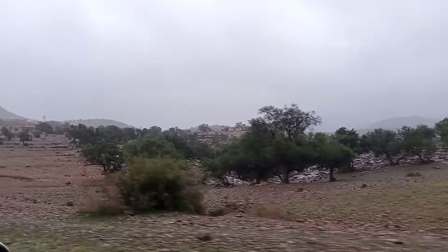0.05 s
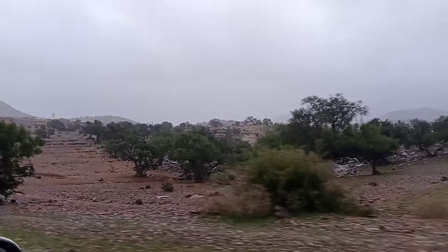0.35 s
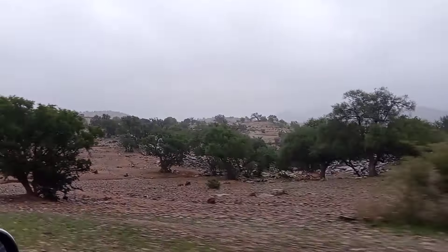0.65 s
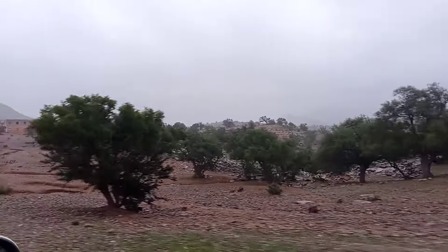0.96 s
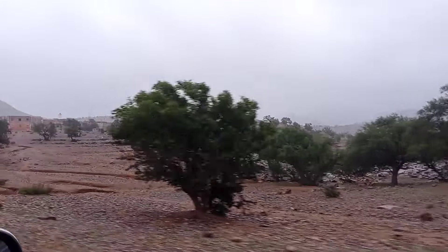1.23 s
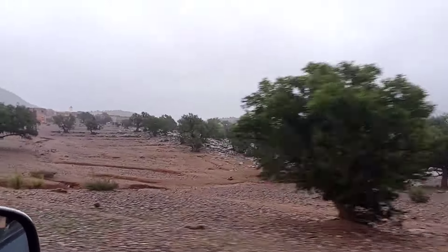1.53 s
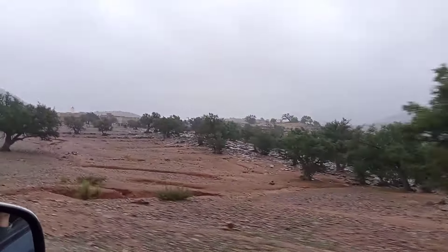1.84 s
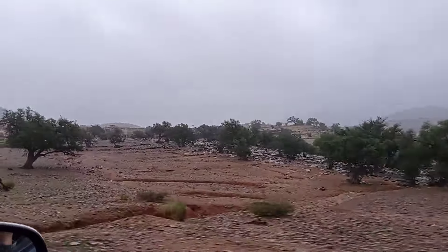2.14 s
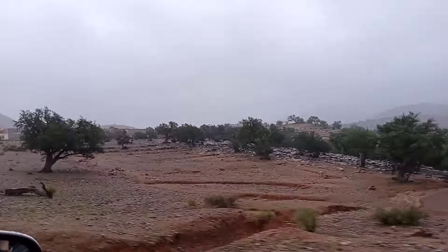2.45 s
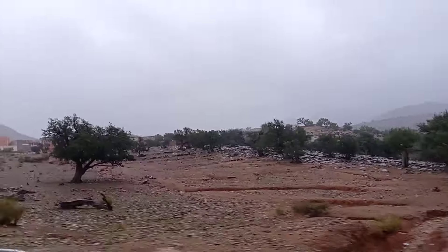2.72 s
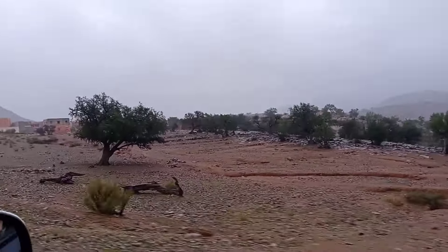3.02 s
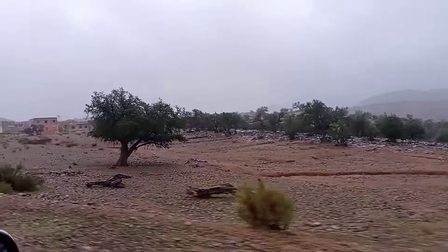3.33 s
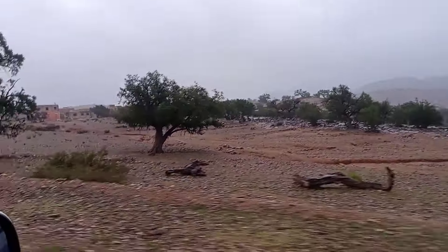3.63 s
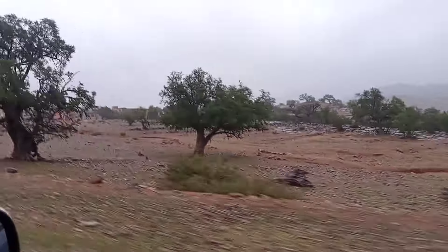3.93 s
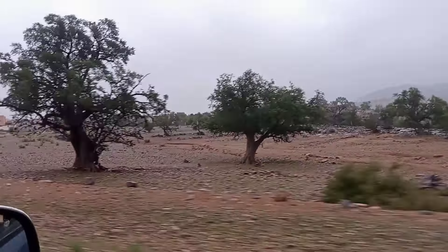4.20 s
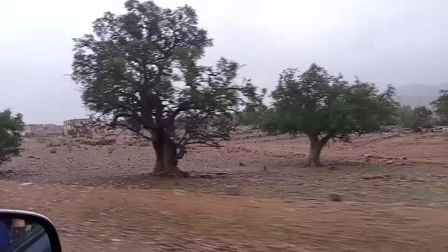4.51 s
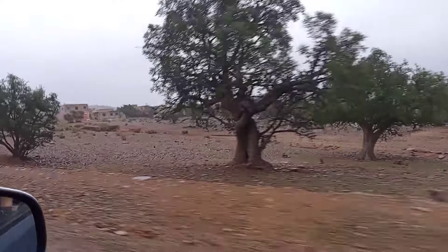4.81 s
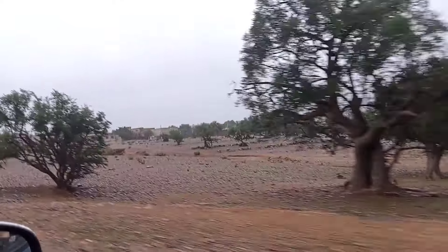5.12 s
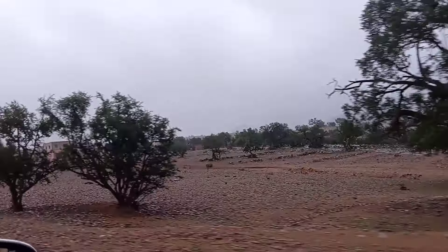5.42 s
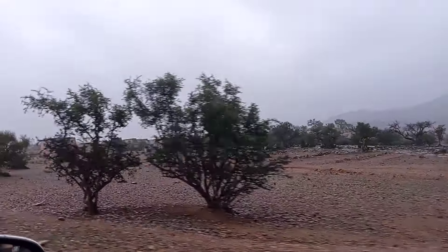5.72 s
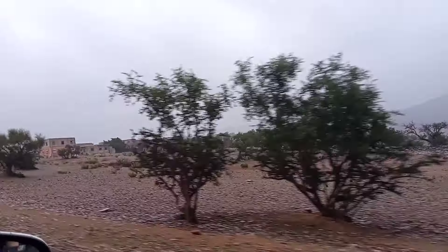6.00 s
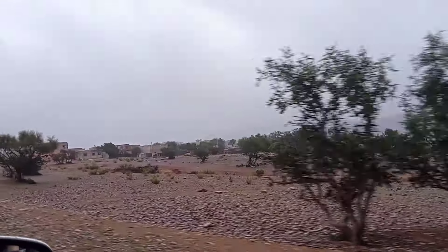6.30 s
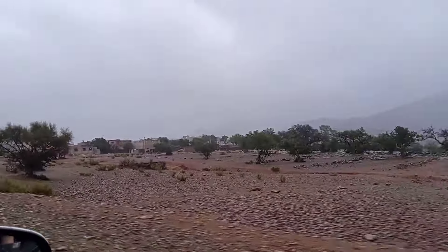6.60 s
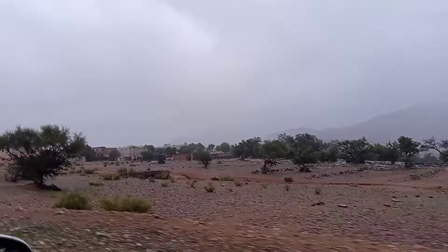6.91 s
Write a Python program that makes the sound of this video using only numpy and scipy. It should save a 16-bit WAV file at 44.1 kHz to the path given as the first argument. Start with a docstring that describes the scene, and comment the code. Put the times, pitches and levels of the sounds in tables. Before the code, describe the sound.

A car drives along with a low rumble while gusty wind slaps, crackles and faintly whistles at an open side window.

```python
"""A car drives steadily along a country road, heard at an open side window.
From the start, eddies slap the microphone about twelve times a second over road and engine rumble,
a hollow roar and rushing air. Near 1.5 s a window edge whistles faintly. A gust swells at 3 s with a
louder roar and another whistle. From 4 s rush and roar ease while the eddies crack more often.
Gusts return from 5.6 s, and the edge whistles twice more before the end."""
import sys
import numpy as np
from scipy import signal
from scipy.fft import rfft, irfft
from scipy.io import wavfile
from scipy.ndimage import uniform_filter1d, minimum_filter1d

SR = 44100
rng = np.random.default_rng(int(sys.argv[2]) if len(sys.argv) > 2 else 0)


def digitize_waveform(pressure):
    """Quantize a signal to 16-bit integers and store it at the path in sys.argv[1].

    Rows of a 2-D input are taken as channels; values are limited to [-1, 1].
    """
    field = np.atleast_2d(pressure).T
    bounded = np.clip(field, -1, 1)
    quanta = np.round(bounded * 32767).astype(np.int16)
    wavfile.write(sys.argv[1], SR, quanta)


N = 306495

# Each row: start in seconds, length in seconds, thump level in dB, flutter level in dB.
STRONG_EDDIES = [(0.002, 0.026, -13, -16.5), (0.035, 0.035, -14.5, -12), (0.088, 0.014, -14.5, -16.5),
                 (0.205, 0.049, -16, -15), (0.315, 0.028, -11.5, -13), (0.384, 0.016, -18.5, -23),
                 (0.442, 0.036, -19, -13), (0.524, 0.055, -18.5, -27.5), (0.553, 0.025, -12.5, -13.5),
                 (0.63, 0.033, -13.5, -17), (0.673, 0.0073, -15, -12), (0.709, 0.019, -20, -18),
                 (0.754, 0.021, -12, -13.5), (0.869, 0.033, -11.5, -16.5), (0.937, 0.03, -15.5, -15),
                 (0.974, 0.034, -16.5, -12.5), (1.049, 0.014, -16.5, -20.5), (1.094, 0.017, -18.5, -21),
                 (1.178, 0.032, -17, -12.5), (1.232, 0.028, -14, -16.5), (1.293, 0.039, -12, -15),
                 (1.379, 0.024, -12.5, -14), (1.471, 0.023, -25, -21.5), (1.55, 0.014, -14, -15),
                 (1.587, 0.018, -18, -17), (1.655, 0.038, -18.5, -14.5), (1.757, 0.018, -13.5, -19.5),
                 (1.814, 0.016, -17, -13.5), (1.894, 0.038, -18.5, -20.5), (1.949, 0.039, -18.5, -14.5),
                 (2.017, 0.013, -14.5, -16.5), (2.053, 0.05, -15.5, -22.5), (2.234, 0.026, -12, -21),
                 (2.333, 0.037, -17.5, -22.5), (2.443, 0.021, -17.5, -17.5), (2.488, 0.025, -15, -19),
                 (2.597, 0.029, -13, -18), (2.7, 0.017, -10, -25), (2.754, 0.055, -16, -24),
                 (2.937, 0.041, -8.5, -16.5), (3.022, 0.068, -15.5, -23.5), (3.105, .048, -14, -16.5),
                 (3.212, 0.019, -8.5, -14), (3.293, 0.01, -16.5, -16.5), (3.333, 0.046, -15, -19),
                 (3.405, 0.042, -15, -17.5), (3.499, 0.041, -22.5, -15), (3.543, 0.025, -12.5, -13.5),
                 (3.657, 0.035, -10, -11), (3.729, 0.028, -9.5, -14.5), (3.823, 0.038, -13, -31.5),
                 (3.906, 0.049, -13.5, -14.5), (4.008, 0.031, -26, -15.5), (4.083, 0.019, -14.5, -13),
                 (4.154, 0.013, -18.5, -16), (4.227, 0.054, -16, -18), (4.325, 0.073, -17, -14),
                 (4.418, 0.031, -15, -20), (4.501, .036, -18.5, -16.5), (4.549, 0.028, -17, -17),
                 (4.647, 0.023, -18, -16), (4.734, 0.016, -19.5, -19.5), (4.835, 0.025, -19.5, -15.5),
                 (4.869, 0.05, -15, -17), (4.977, 0.11, -24.5, -16.5), (5.102, 0.047, -20.5, -18),
                 (5.187, 0.05, -12.5, -18.5), (5.259, 0.038, -19.5, -17.5), (5.355, 0.018, -16.5, -20),
                 (5.4, 0.042, -14, -23.5), (5.529, 0.02, -9.5, -20), (5.638, 0.038, -12.5, -13),
                 (5.679, 0.023, -5.5, -22.5), (5.769, 0.042, -15, -16), (5.839, 0.016, -20, -25),
                 (5.882, 0.027, -14.5, -26), (5.941, 0.054, -16.5, -19), (6.037, 0.026, -16.5, -18.5),
                 (6.078, 0.0096, -21.5, -17), (6.207, 0.04, -13, -13), (6.319, 0.075, -18.5, -28.5),
                 (6.43, 0.023, -13, -13), (6.481, 0.02, -17, -21.5), (6.578, 0.033, -7.5, -14.5),
                 (6.624, 0.016, -20, -15), (6.729, 0.03, -13.5, -15), (6.814, 0.024, -11, -15),
                 (6.919, 0.021, -24, -14.5)]
# Midrange of an eddy. Each row: frequency in Hz, relative level in dB.
FLUTTER_SPECTRUM = [(90, -27), (160, -8), (210, 2), (310, 0.5), (450, -6), (680, -11.5), (900, -24),
                    (1300, -29), (2200, -36), (4500, -71.5)]
# Tearing air. Each row: frequency in Hz, relative level in dB.
RASP_SPECTRUM = [(150, -6.5), (400, 14), (800, 12.5), (1500, 4.5), (2200, -2.5), (3000, -7.5),
                 (4000, -19.5), (5000, -32.5), (7000, -41), (9500, -52.5), (13000, -57)]
# Air streaming past the window. Each row: time in seconds, level in dB.
AIRFLOW_LEVELS = [(0, -43.5), (0.56, -43), (1.02, -44), (1.2, -42.5), (1.76, -42), (1.84, -47), (1.92, -42),
                  (2.35, -44), (2.44, -38), (2.8, -41.5), (2.96, -35), (3.19, -36.5), (3.24, -44.5),
                  (3.3, -34), (3.43, -36), (3.49, -33.5), (3.58, -38.5), (3.73, -37), (3.9, -39.5),
                  (4.05, -50), (4.47, -49), (4.56, -42), (4.98, -47), (5.58, -43), (5.615, -36),
                  (5.77, -40.5), (5.81, -46.5), (5.92, -41), (6.13, -41.5), (6.19, -37), (6.415, -32),
                  (6.445, -39.5), (6.95, -39.5)]


def buffeting(slap_db=-0.5, flap_db=-1.5, spread_octaves=0.2):
    """Each eddy thumps and flutters at a slightly different, random pitch; a few milliseconds in, a sharp slap
    strikes the microphone."""
    # Low end of an eddy. Each row: frequency in Hz, relative level in dB.
    thump_spectrum = [(12, -40), (25, -31), (34, -27), (48, -19.5), (69, -4.5), (118, -1), (178, -3),
                      (240, -15), (380, -32)]
    out = np.zeros(N)
    eddies = STRONG_EDDIES + weak_eddies()
    stretches = 2 ** (spread_octaves * rng.uniform(-0.97, 1, (len(eddies), 2)))
    for (start_s, length_s, thump_db, flutter_db), (low_stretch, mid_stretch) in zip(eddies, stretches):
        low = impulse_response(thump_spectrum, low_stretch)
        mid = impulse_response(FLUTTER_SPECTRUM, mid_stretch)
        slap = eddy_burst(0.0039, mid, rise_s=0.00023, fall_s=0.0014, sag_db=0, lumpy_db=-4)
        thump = eddy_burst(length_s, low, rise_s=0.0015, fall_s=0.0058, sag_db=5, lumpy_db=3)
        flap = eddy_burst(length_s, mid, rise_s=0.0034, fall_s=0.0034, sag_db=2.5, lumpy_db=4.5)
        add(out, start_s + 0.002965, gain_of(flutter_db + slap_db) * slap)
        add(out, start_s - 0.002, gain_of(thump_db) * thump)
        add(out, start_s + 0.00098, gain_of(flutter_db + flap_db) * flap)
    return out


def weak_eddies(shed_hz=12, jitter_s=0.004, length_s=0.04, thump_db=-20.5, flutter_db=-31, spread_db=2.5):
    """Near-regular shedding fills the pauses with weak eddies; rows as in STRONG_EDDIES."""
    strong_s = [row[0] for row in STRONG_EDDIES] + [N / SR + 0.5 / shed_hz]
    rows = []
    for from_s, to_s in zip(strong_s, strong_s[1:]):
        periods = max(round((to_s - from_s) * shed_hz), 1)
        for start_s in np.linspace(from_s, to_s, periods + 1)[1:-1]:
            late_s, low_db, mid_db = rng.standard_normal(3) * (jitter_s, spread_db, spread_db)
            rows.append((start_s + late_s, length_s, thump_db + low_db, flutter_db + mid_db))
    return rows


def eddy_burst(length_s, response, rise_s, fall_s, sag_db, lumpy_db, size=8192):
    """Turbulent pressure rises, sags and falls; its energy equals unit rms over length_s."""
    t = np.arange(size) / SR
    release = np.exp(-np.maximum(t - length_s, 0) / fall_s)
    envelope = np.minimum(t / rise_s, 1) * gain_of(-sag_db * t / length_s) * release
    lumps = unit_rms(uniform_filter1d(rng.standard_normal(size), size=140))
    turbulence = envelope * gain_of(lumpy_db * lumps) * rng.standard_normal(size)
    burst = signal.fftconvolve(turbulence, response)
    return burst * np.sqrt(length_s * SR / np.sum(burst ** 2))


def cracks(trim_db=1, snap_db=0.5, build_ratio=0.8, treble_hz=2180, octaves_per_db=0.032, size=4096):
    """Air tears across the microphone port: a rasp builds, snaps at its crest and dies."""
    # Hardest eddies. Each row: crest in seconds, decay in seconds, level in dB, treble gain in dB.
    crests = [(0.0491, 0.0053, -22.5, 6), (0.3249, 0.0028, -19, -11.5), (0.5873, 0.0024, -23, -2),
              (0.6585, 0.0018, -20.5, -12), (0.6778, 0.0016, -14, -13), (0.7635, 0.0023, -19.5, -4.5),
              (0.9819, 0.0015, -24, -7), (1.2444, 0.0021, -23.5, -8), (1.3345, 0.0016, -24, -6.5),
              (1.4035, 0.0076, -30, -14), (1.4869, 0.0067, -21.5, -10), (1.558, 0.004, -21, -14),
              (1.8222, 0.003, -44, 6), (1.9591, 0.006, -25, -8), (2.45, 0.0072, -21.5, -9),
              (2.5003, 0.0032, -22.5, -12), (2.7093, 0.0031, -18, -15), (3.2213, 0.0033, -12.5, -18),
              (3.5603, 0.0026, -17, -8), (3.6756, 0.0039, -21, 0), (3.9136, 0.0048, -23, 5.5),
              (3.9245, 0.0071, -21, 6), (3.9597, 0.0018, -26, -13), (4.0184, 0.0017, -18.5, -7.5),
              (4.0238, 0.00197, -23.5, 1), (4.0851, 0.0051, -29, 9), (4.159, 0.0023, -26.5, 9),
              (4.2341, 0.0029, -27.5, 0), (4.2481, 0.0079, -17, 2), (4.2821, 0.0058, -21, -5),
              (4.332, 0.0062, -20.5, 2.5), (4.3743, 0.0035, -25, -1), (4.3895, 0.004, -23.5, -1),
              (4.4367, 0.0021, -19.5, -11), (4.5125, 0.0015, -21, -16.5), (4.5307, 0.0077, -16, -4.5),
              (4.57, 0.0046, -27, -1), (4.658, 0.004, -19, -6), (4.841, 0.006, -23, -12),
              (4.9069, 0.0031, -21.5, 4), (4.9945, 0.002, -26, 1), (5.0658, 0.0009, -22.0, -8),
              (5.1059, 0.0051, -19.5, -3.5), (5.1443, 0.002, -19, -7), (5.2147, 0.0031, -24, -13),
              (5.2308, 0.0037, -22, -4), (5.6864, 0.0028, -14, -5.5), (5.7763, 0.0026, -22.5, -3),
              (5.7879, 0.0032, -26, 3.5), (5.852, 0.0026, -26, -2), (5.9424, 0.0025, -22, -14),
              (6.2126, 0.0052, -15.5, -14), (6.2239, 0.006, -14, -17), (6.8173, 0.0039, -22, -11),
              (6.9277, 0.006, -29.5, 5)]
    out = np.zeros(N)
    t = (np.arange(size) - size // 2) / SR
    shelf = 1 - 1 / (1 + (np.fft.rfftfreq(size, 1 / SR) / treble_hz) ** 4)
    scale = np.sqrt(0.007 * SR)  # unit energy to unit rms over 7 ms
    for crest_s, decay_s, level_db, treble_db in crests:
        stretch = 2 ** (octaves_per_db * min(treble_db, 0))  # dull cracks pop deeper
        rasp = impulse_response(RASP_SPECTRUM, stretch)
        envelope = np.exp(-abs(t) / np.where(t < 0, build_ratio * decay_s, decay_s))
        tear = rng.standard_normal(size) * envelope
        snap = gain_of(snap_db) * (t == 0)
        pop = signal.fftconvolve(tear / np.linalg.norm(tear) + snap, rasp)[:size]
        pop = irfft(rfft(pop / np.linalg.norm(pop)) * gain_of(treble_db * shelf))
        add(out, crest_s + t[0], gain_of(level_db + trim_db) * scale * pop)
    return out


def crackle(buffets, relative_db=-23.5, snaps_per_s=150, spread_db=2.5):
    """The flow tears in tiny random snaps, loudest where it buffets hardest."""
    power = abs(uniform_filter1d(buffets ** 2, size=300))
    onsets = rng.random(N) < snaps_per_s / SR
    sizes = gain_of(spread_db * np.minimum(rng.exponential(1, N), 2))
    snaps = onsets * sizes * np.sign(buffets) * np.sqrt(power)
    rasp = signal.oaconvolve(snaps, impulse_response(RASP_SPECTRUM))[:N]
    return gain_of(relative_db) * np.std(buffets) * unit_rms(rasp)


def ripples(level_db=-34, lumpy_db=4, lumps_hz=27):
    """Small eddies keep the air restless between the large ones."""
    flutter = noise(lambda hz: spectrum_gain(FLUTTER_SPECTRUM, hz))
    return gain_of(level_db) * unit_rms(flutter * gain_of(lumpy_db * wander(lumps_hz)))


def road_and_engine(rumble_db=-24, bumps_db=3.5, gust_share=0.32, engine_db=-36.5, firing_hz=121.6):
    """The body rumbles on the road, more in a gust, around the engine's wavering firing note."""
    # Body rumble. Each row: frequency in Hz, relative level in dB.
    rumble_spectrum = [(12, -54), (24, -37), (33, -29), (50, -15), (80, 4), (120, 1.5), (170, 2),
                       (270, -6.5), (500, -16), (750, -22), (1200, -43)]
    rumble = noise(lambda hz: spectrum_gain(rumble_spectrum, hz))
    rumble *= gain_of(bumps_db * wander(rate_hz=3.4) + gust_share * follow(AIRFLOW_LEVELS))
    firings = wavering_cycles(firing_hz, depth=0.035, rate_hz=6)
    engine = np.sin(2 * np.pi * firings)
    return gain_of(rumble_db) * unit_rms(rumble) + gain_of(engine_db) * unit_rms(engine)


def window_roar(trim_db=-2.5, uneven_db=2.5, waver_db=0.8, waver_hz=7):
    """A hollow, wavering roar near 1 kHz that swells with the gusts."""
    # Each row: frequency in Hz, half-width in Hz, relative level in dB.
    resonances = [(993, 58, 4), (1283, 60, -3), (1500, 100, -11.5), (881, 230, -4), (1940, 100, -9.5)]
    # Each row: time in seconds, level in dB.
    roar_levels = [(0.0, -31.5), (0.78, -31), (2.85, -30), (2.93, -23), (3.17, -27), (3.24, -37),
                   (3.45, -30), (3.89, -31.5), (4.09, -41), (4.63, -34), (5.53, -35.5), (5.67, -30),
                   (5.89, -34.5), (6.2, -32.5), (6.4, -25.5), (6.45, -30), (6.76, -35.5), (6.95, -30)]
    roar = np.zeros(N)
    for centre_hz, width_hz, level_db in resonances:
        cycles = wavering_cycles(centre_hz, depth=0.018, rate_hz=waver_hz)
        ring = noise_band(cycles, width_hz) * np.sqrt(width_hz)
        roar += ring * gain_of(level_db + waver_db * wander(waver_hz))
    return unit_rms(roar) * gain_of(follow(roar_levels) + trim_db + uneven_db * wander(rate_hz=18))


def cabin_boom(trim_db=-4.5, centre_hz=56.3, width_octaves=0.31):
    """The cabin air booms softly behind the open window."""
    # Each row: time in seconds, level in dB.
    boom_levels = [(0, -43.5), (0.7, -29.5), (1.3, -27), (1.6, -32.5), (2.5, -36), (3.0, -31), (3.75, -27),
                   (4.05, -42), (4.4, -38.5), (6.95, -34.5)]
    band = noise(lambda hz: np.exp(-(np.log2((hz + 1) / centre_hz) / width_octaves) ** 2 / 2))
    return band * gain_of(follow(boom_levels) + trim_db)


def air_rush(trim_db=2.5, flicker_db=1.57, bright_hz=4870, bright_octaves=0.3, brighten=0.35):
    """Air hisses round the window frame; in a gust a bright band swells faster than the rest."""
    # Each row: frequency in Hz, relative level in dB.
    hiss_spectrum = [(720, -3), (1350, 7), (1950, -4), (2650, -3), (3200, -9), (4250, -16), (5050, -27),
                     (7050, -29), (8100, -37.5), (9700, -44.5), (12000, -48), (13800, -45), (15500, -46.5)]
    flow_db = follow(AIRFLOW_LEVELS)
    gust_db = np.maximum(flow_db - np.median(flow_db), 0)
    hiss = noise(lambda hz: spectrum_gain(hiss_spectrum, hz))
    offset_octaves = np.log2((np.fft.rfftfreq(N, 1 / SR) + 1) / bright_hz)
    bright_band = irfft(rfft(hiss) / (1 + (offset_octaves / bright_octaves) ** 2), N)
    hiss += bright_band * (gain_of(brighten * gust_db) - 1)
    return hiss * gain_of(flow_db + trim_db + flicker_db * wander(rate_hz=21))


def edge_whistle(tone_db=-3.5, fuzz_db=-12, hiss_db=-58.5):
    """Air on a window edge sounds a fuzzy tone that swells and fades in a lasting band of hiss."""
    # Edge tone, set by air speed. Each row: time in seconds, pitch in Hz.
    edge_pitches = [(1.3, 2270), (1.5, 2305), (1.7, 2230), (2.3, 2202), (2.55, 2226), (3.13, 2298),
                    (5.9, 2270), (6.2, 2297), (6.5, 2336), (6.9, 2380)]
    # Each row: time in seconds, level in dB.
    edge_levels = [(0, -62), (1.25, -51), (1.52, -41.5), (1.72, -54), (2.35, -50.5), (2.75, -55.5),
                   (3.12, -39.5), (3.25, -56), (5.6, -65), (5.95, -49), (6.21, -37), (6.3, -49), (6.5, -47),
                   (6.68, -40), (6.8, -50), (6.95, -58)]
    cycles = wavering_cycles(follow(edge_pitches), depth=0.001, rate_hz=43)
    tone = gain_of(tone_db) * unit_rms(np.sin(2 * np.pi * cycles))
    fuzz = gain_of(fuzz_db) * noise_band(cycles, half_width_hz=25)
    hiss = gain_of(hiss_db) * noise_band(cycles, half_width_hz=91)
    return gain_of(follow(edge_levels)) * (tone + fuzz) + hiss


def high_ticks(relative_width=0.1):
    """Very faint, short ticks near 12 kHz, among a few longer hisses."""
    # Each row: start in seconds, length in seconds, level in dB, centre in Hz.
    ticks_and_hisses = [(0.263, 0.024, -63, 7500), (0.672, .004, -68, 12000), (0.965, .004, -69, 12500),
                        (1.385, .004, -71, 12000), (2.795, 0.022, -60, 5860), (2.991, .07, -63, 14000),
                        (3.018, 0.036, -65, 6950), (3.203, 0.45, -73, 13000), (3.926, .004, -61, 12000),
                        (4.43, .004, -71, 12000), (4.987, .004, -65, 12000), (5.206, 0.0044, -65, 12000),
                        (5.545, .004, -71, 12000), (5.642, .006, -68, 12000), (5.688, 0.0042, -61, 12100),
                        (5.785, .004, -63, 12000)]
    out = np.zeros(N)
    hz = np.fft.rfftfreq(SR, 1 / SR)
    for start_s, length_s, level_db, centre_hz in ticks_and_hisses:
        detuning = (hz / centre_hz - 1) / relative_width
        band = irfft(rfft(rng.standard_normal(SR)) / (1 + detuning ** 2))[:int(length_s * SR)]
        add(out, start_s, gain_of(level_db) * unit_rms(band * np.hanning(len(band))))
    return out


def gain_of(db):
    """Decibels to amplitude factor."""
    return 10 ** (np.asarray(db) / 20)


def unit_rms(x):
    """Scales to an rms of one."""
    return x / np.sqrt(np.mean(x ** 2) + 1e-20)


def spectrum_gain(spectrum, hz):
    """Gain interpolated on log frequency, falling 24 dB per octave above the last point."""
    points_hz, points_db = np.transpose(spectrum)
    db = np.interp(np.log(hz + 1), np.log(points_hz + 1), points_db)
    octaves_over = np.log2(np.maximum(hz / points_hz[-1], 1))
    return gain_of(np.maximum(db - 24 * octaves_over, -110))


def impulse_response(spectrum, stretch=1, size=4096):
    """Minimum-phase response of a spectrum stretched in frequency: sharp front, ringing tail."""
    hz = abs(np.fft.fftfreq(size, 1 / SR))
    log_gain = np.log(spectrum_gain(spectrum, hz / stretch))
    return np.fft.ifft(np.exp(signal.hilbert(log_gain).conj())).real[:size // 2]


def follow(curve):
    """A control curve at every sample."""
    return np.interp(np.arange(N) / SR, *np.transpose(curve))


def add(mix, start_s, sound):
    """Mixes a sound in, starting no earlier than zero."""
    part = mix[max(round(start_s * SR), 0):][:len(sound)]
    part += sound[:len(part)]


def noise(shape):
    """Unit-rms noise with magnitude spectrum shape(hz)."""
    return unit_rms(irfft(rfft(rng.standard_normal(N)) * shape(np.fft.rfftfreq(N, 1 / SR)), N))


def wander(rate_hz):
    """Slow random drift of unit rms."""
    return noise(lambda hz: 1 / (1 + (hz / rate_hz) ** 4))


def wavering_cycles(pitch_hz, depth, rate_hz):
    """Running phase in cycles of a pitch that drifts by the fraction depth."""
    return np.cumsum(pitch_hz * (1 + depth * wander(rate_hz))) / SR


def noise_band(cycles, half_width_hz):
    """Resonant noise centred on a running phase."""
    inphase, quadrature = (noise(lambda hz: 1 / (1 + (hz / half_width_hz) ** 2)) for _ in range(2))
    return inphase * np.cos(2 * np.pi * cycles) + quadrature * np.sin(2 * np.pi * cycles)


def scene():
    """All sources meet at one microphone."""
    buffets = buffeting()
    wind = buffets + crackle(buffets) + cracks() + ripples()
    car = road_and_engine() + cabin_boom()
    return (wind + car + window_roar() + air_rush() + edge_whistle() + high_ticks())[None]


def record(dry):
    """A fast limiter ducks the whole mix on the hardest slaps; a low-pass follows."""
    ceiling_db, release_db_per_s, cutoff_hz = -1, 200, 15650
    release_db = np.arange(N) * release_db_per_s / SR
    peak_db = 20 * np.log10(abs(dry[0]) + 1e-9)
    held_db = np.maximum.accumulate(peak_db + release_db) - release_db
    over_db = np.maximum(held_db - ceiling_db, 0)
    duck_db = uniform_filter1d(minimum_filter1d(-over_db, size=91), size=91)
    limited = dry * gain_of(uniform_filter1d(duck_db, size=25))
    lowpass = signal.firwin(511, cutoff_hz, window=("kaiser", 9), fs=SR)
    return signal.oaconvolve(limited, lowpass[None], "same")


dry = scene()
out = record(dry)
digitize_waveform(out)
```